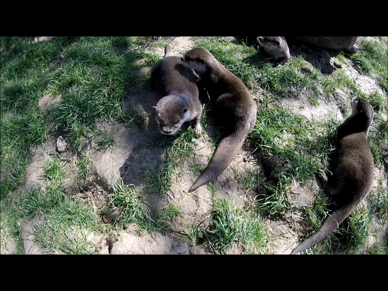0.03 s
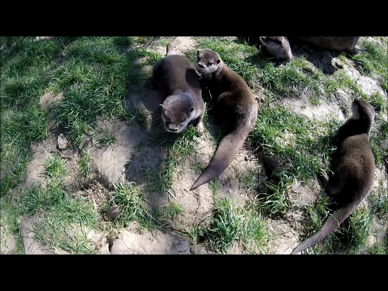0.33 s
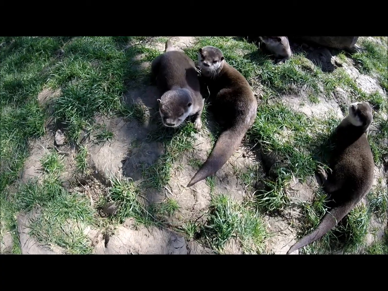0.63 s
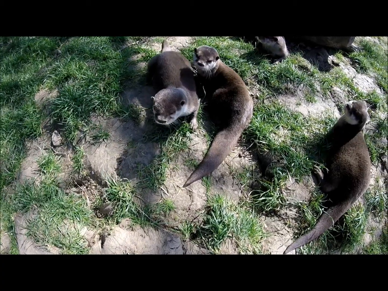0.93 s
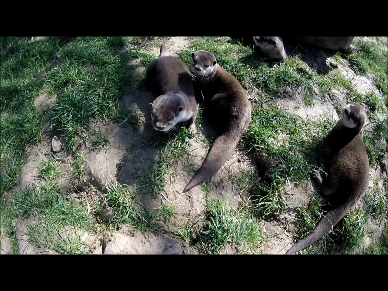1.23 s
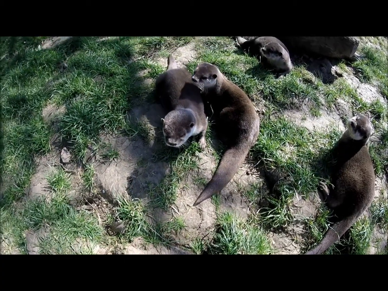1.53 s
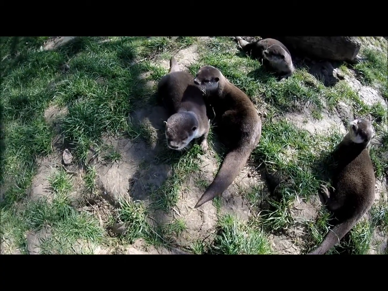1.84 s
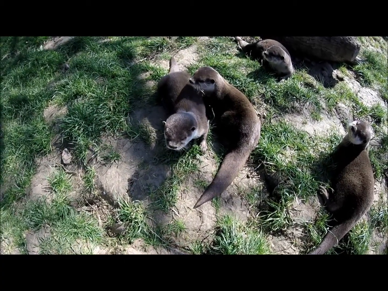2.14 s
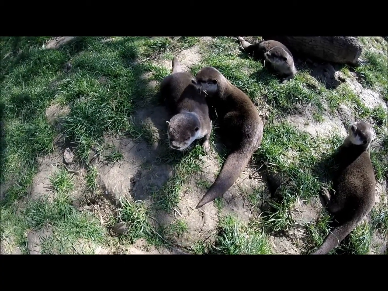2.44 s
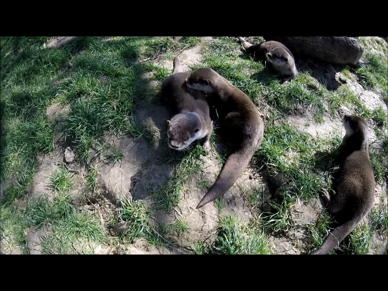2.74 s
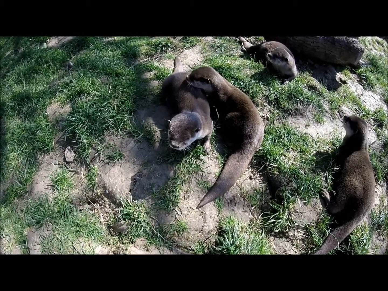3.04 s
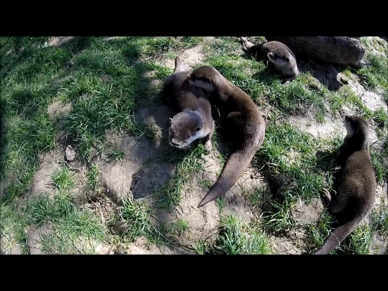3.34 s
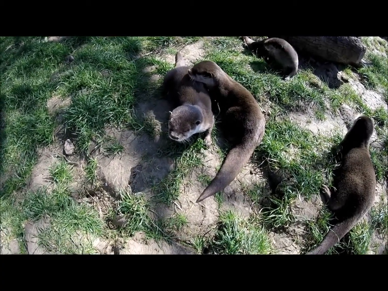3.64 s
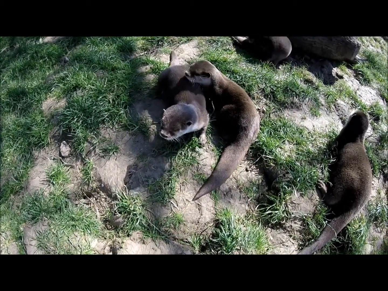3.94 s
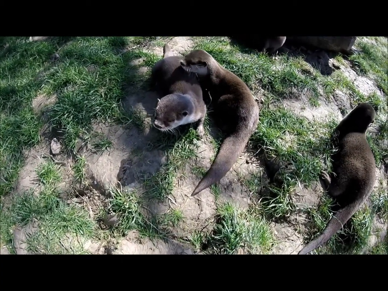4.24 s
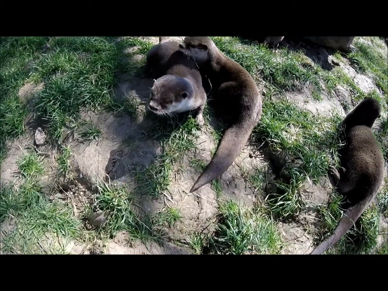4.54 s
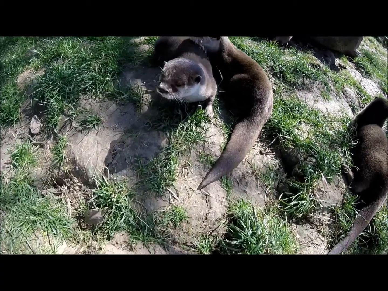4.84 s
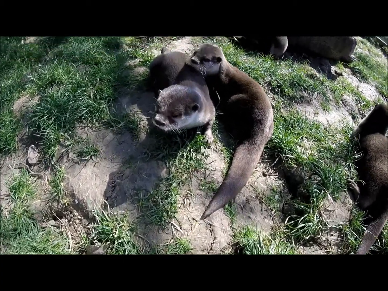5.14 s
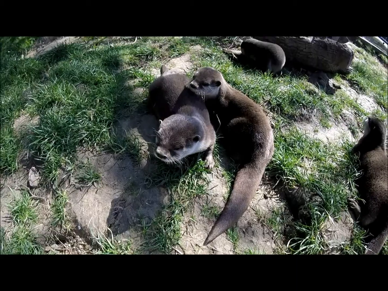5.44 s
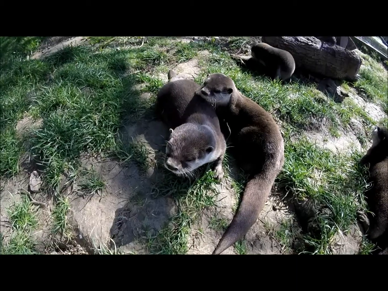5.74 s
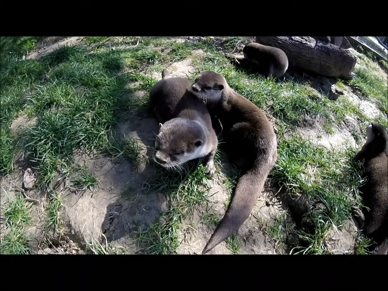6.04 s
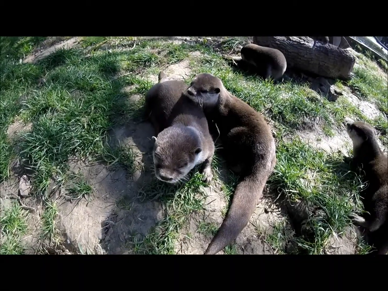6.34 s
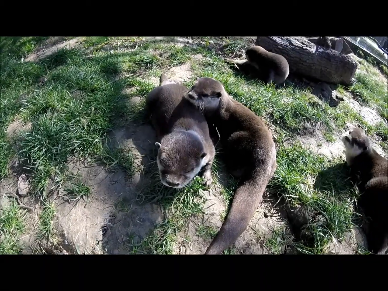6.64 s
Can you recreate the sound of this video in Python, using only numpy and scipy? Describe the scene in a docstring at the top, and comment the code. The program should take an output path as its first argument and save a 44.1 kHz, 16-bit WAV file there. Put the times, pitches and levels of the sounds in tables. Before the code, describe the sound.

After an instant of silence, faint far-off traffic and air set in outdoors, along with the low tremble of a hand holding the camera. Close to the microphone, the mechanism hisses and chatters, giving small irregular pinging ticks. Soft finger taps, a few muffled bumps and barely audible rustles come and go. From about four seconds the handling rumble grows stronger and the taps cluster, though everything stays quiet.

```python
"""A quiet outdoor enclosure, heard from a hand-held camera. After a moment's silence a faint wash of far air
and traffic sets in, with the rumble of the hand's tremor and the hiss and chatter of the camera's mechanism.
Almost at once fingers begin to knock softly on the shell, and the mechanism ticks in its resonant case.
After a second come occasional dull bumps of the grip, then faint rustles.
From four seconds on the camera moves, and the hand drives the rumble harder."""
import sys
import numpy as np
from scipy import signal
from scipy.fft import rfft, irfft, next_fast_len
from scipy.io import wavfile
from scipy.ndimage import uniform_filter1d, map_coordinates

SR = 44100
rng = np.random.default_rng(int(sys.argv[2]) if len(sys.argv) > 2 else 0)


def transcribe(u):
    """Save the signal u as a 16-bit wav file named by the first command-line argument.

    u: samples, shape (n,) or (channels, n), limited to [-1, 1]; the rate is SR.
    q: integer samples, one column per channel.
    """
    v = np.clip(np.atleast_2d(u).T, -1, 1)
    q = np.round(v * 32767).astype(np.int16)
    wavfile.write(sys.argv[1], SR, q)


N = 298998
TIME = np.arange(N) / SR


def amp(db):
    """Amplitude ratio of a level in decibels."""
    return 10 ** (np.asarray(db) / 20)


def unit(x):
    """Normalisation to rms 1."""
    return x / np.sqrt(np.mean(x ** 2) + 1e-20)


def curve(rows):
    """Linear interpolation of (seconds, value) rows at every sample."""
    return np.interp(TIME, *np.transpose(rows))


def wobble(rate):
    """Smooth random modulation: a spline through `rate` Gaussian knots a second."""
    knots = rng.standard_normal(int(N * rate / SR) + 4)
    return map_coordinates(knots, [TIME * rate])


def filtered(x, response):
    """Linear filtering: the spectrum of x times a frequency response."""
    size = next_fast_len(N + SR // 2)
    return irfft(rfft(x, size) * response(np.fft.rfftfreq(size, 1 / SR)), size)[:N]


def noise(spectrum):
    """Spectral shaping of white noise by (Hz, dB) rows on a log frequency axis; rms 1."""
    points_hz, db = np.transpose(spectrum)
    white = rng.standard_normal(N)
    return unit(filtered(white, lambda hz: amp(np.interp(np.log(hz + 1), np.log(points_hz + 1), db))))


def resonance(hz, centre, width):
    """Frequency response of a damped oscillator, 1 at its centre."""
    return 1j * hz * width / (centre ** 2 - hz ** 2 + 1j * hz * width)


# Spectrum of the far wash. Each row: frequency in Hz, relative spectral density in dB.
WASH_SPECTRUM = [(30, -41), (110, 3), (200, 0), (270, -2.5), (450, -5.5), (700, -9), (1100, -13.5),
                 (2000, -24.5), (5000, -41), (15000, -46.5)]

def distant_wash():
    """Incoherent superposition: far air and traffic merge into a dull, nearly steady noise."""
    fade_db_per_s = 0.01
    level_db = -56.5 - fade_db_per_s * TIME + 0.48 * wobble(rate=5.46)
    return amp(level_db) * noise(WASH_SPECTRUM)


def sustained(x, evenness):
    """Envelope compression evens out the swells of a narrow noise, as in a vibration kept going."""
    envelope = np.abs(signal.hilbert(x))
    power = np.abs(uniform_filter1d(envelope ** 2, size=SR // 10))
    return unit(x / (power + 1e-3) ** (evenness / 2))


# Spectra of the camera's sway and the grip's shudder.
# Each row: frequency in Hz, relative spectral density in dB.
SWAY_SPECTRUM = [(5, -51), (11, -13.5), (23, -12), (31, -1.5), (42, -6), (53, -15), (80, -41), (160, -60),
                 (400, -120)]
SHUDDER_SPECTRUM = [(20, -56), (45, -16), (62, -1), (80, 0.5), (93, -4), (112, -22), (215, -25.5),
                    (450, -43), (1500, -100)]
# Effort of the hand. Each row: time in seconds, level in dB relative to rest.
HAND_EFFORT = [(.2, .5), (.9, 0), (1.45, 3), (1.75, -2), (2.7, 0.5), (3.15, -4), (3.4, 0), (3.63, -5.5),
               (3.78, 0), (3.97, -1), (4.05, 9), (4.18, 3), (4.32, 11.5), (4.4, 5), (4.47, 13), (4.54, 8.5),
               (4.7, 14), (4.93, 6), (5.0, 13.5), (5.08, 4.5), (5.2, 14), (5.33, 8.5), (5.4, 12.5),
               (5.48, 4.5), (5.57, 10.5), (5.69, 5), (5.76, 9), (5.86, 4), (5.97, 12), (6.04, 9.5),
               (6.17, 12.5), (6.43, 9), (6.54, -3.5), (6.68, 7), (6.78, 1)]

def hand_rumble():
    """Forced vibration: the trembling hand sways and shudders the camera, harder as its effort grows."""
    effort_db = curve(HAND_EFFORT)
    tremor_db = 1.97 * wobble(rate=13)
    sway = sustained(noise(SWAY_SPECTRUM), evenness=0.88)
    shudder = sustained(noise(SHUDDER_SPECTRUM), evenness=0.47)
    sway_db = -48.5 + effort_db + tremor_db
    shudder_db = -55.5 + 0.72 * effort_db + tremor_db
    return amp(sway_db) * sway + amp(shudder_db) * shudder


# Spectrum of the mechanism's hiss. Each row: frequency in Hz, relative spectral density in dB.
HISS_SPECTRUM = [(300, -7.5), (1100, -1.5), (1950, 1), (2400, -0.5), (3100, -0.5), (3550, -3), (4200, -4),
                 (5300, -9), (7300, -10), (8000, -12.5), (10000, -16), (12500, -23.5), (15000, -30)]

def mechanism_hiss():
    """Broadband noise from the running mechanism, with slight random amplitude modulation."""
    return amp(-62 + 0.56 * wobble(rate=20)) * noise(HISS_SPECTRUM)


# Activity of the mechanism, for chatter and patter. Each row: time in seconds, relative level in dB.
ACTIVITY = [(.2, 1), (.65, -2.5), (.8, -0.5), (1.3, -2), (1.5, 1), (1.75, 0), (2.3, 0.7), (2.7, 1),
            (3.05, -0.3), (3.3, -1), (3.55, 0), (4.3, 0), (4.95, -0.5), (5.35, 0.5), (5.87, -1), (6.1, -1),
            (6.24, 2.5), (6.44, 2), (6.55, -3.5), (6.78, -5)]
# Modes of the camera case. Each row: frequency in Hz, bandwidth in Hz, relative gain in dB,
# chatter depth in dB, dB of drive per dB of activity.
CASE_MODES = [(1472, 96, 2.2, 2, 0.5), (2152, 87, -1.5, 2, 0.5), (2657, 78, 2.3, 2.5, 1),
              (3380, 154, -4, 3, 1), (4060, 270, -12.5, 5.5, 1.5), (6150, 270, -11.5, 3.5, 0),
              (6200, 140, -11, 2, 1), (8370, 220, -18, 5, 1)]

def case_chatter():
    """Resonance under random forcing: the mechanism's fine chatter rings the case modes unevenly."""
    activity_db = curve(ACTIVITY)
    shared_flutter = wobble(rate=60)
    ring = np.zeros(N)
    for centre, width, gain_db, depth_db, follows in CASE_MODES:
        flutter = 0.5 * shared_flutter + 0.79 * wobble(rate=110)
        drive = unit(rng.standard_normal(N) * amp(follows * activity_db + depth_db * flutter))
        ring += amp(gain_db) * filtered(drive, lambda hz: resonance(hz, centre, width))
    return amp(-64.5) * unit(ring)


def mechanism_patter(per_s=330, middle_hz=2404, spread_octaves=0.307, life_cycles=4.9, scatter_db=2.5):
    """Shot noise: tiny clicks at random moments, each a damped oscillation at its own pitch."""
    draws = rng.random((int(per_s * N / SR), 3))
    onsets = (draws[:, :1] * N).astype(int)
    deviations = np.sqrt(2) * np.arctanh(0.96 * (2 * draws[:, 1:] - 1))  # bell-shaped, bounded
    pitch, size = deviations.T[..., None]
    offsets = np.arange(SR // 100)
    cycles = middle_hz * 2 ** (spread_octaves * pitch) * offsets / SR
    age = cycles / life_cycles
    strength = amp(scatter_db * np.minimum(size, 2))
    clicks = strength * age * np.exp(-2 * age) * np.sin(2 * np.pi * cycles)
    patter = np.bincount((onsets + offsets).ravel(), clicks.ravel(), N)[:N]  # overlapping clicks add
    return amp(-69.5 + curve(ACTIVITY)) * unit(patter)


def blows(events, modes, attack_s):
    """Modal impact: a softer contact excites the high modes less; a resting finger damps the ring."""
    out, t = np.zeros(N + SR), np.arange(SR // 2) / SR
    for start, peak_db, cutoff_hz, ring_share in events:
        ring = np.zeros(len(t))
        for hz, mode_db, t60 in modes:
            strength = amp(mode_db + rng.normal(0, 1)) / (1 + (hz / cutoff_hz) ** 4)
            decay = np.exp(-np.log(1000) * t / (t60 * ring_share))
            ring += strength * decay * np.sin(2 * np.pi * hz * t)
        ring *= 1 - np.exp(-(t / attack_s) ** 2)
        out[round(start * SR):][:len(t)] += amp(peak_db) * ring / np.abs(ring).max()
    return out[:N]


# Modes of the shell. Each row: frequency in Hz, relative level in dB, 60 dB decay time in seconds.
SHELL_MODES = [(160.5, -5.5, 0.098), (217, -3, 0.11), (348, -3.5, 0.18)]
# Finger contacts. Each row: start in seconds, relative peak level in dB, contact cut-off in Hz,
# ring time as a fraction of the modes' decay time.
FINGER_KNOCKS = [(0.186, -42.5, 215, .5), (0.76, -42, 210, 1), (3.3535, -41.5, 240, 0.27),
                 (3.997, -44.5, 260, .4), (4.53, -41, 240, 0.99), (4.934, -46, 220, 0.42),
                 (5.115, -44, 140, 1), (5.148, -43, 120, 0.89), (5.245, -43.5, 120, 1),
                 (5.457, -40.5, 250, .7), (5.481, -47, 480, 1), (5.499, -37, 456, 0.72),
                 (5.812, -41, 200, .8), (5.85, -45, 220, 1)]

def finger_knocks():
    """Free vibration after impact: fingers knock softly and the shell's modes ring down."""
    return amp(-2) * blows(FINGER_KNOCKS, SHELL_MODES, attack_s=0.00235)


def strike_envelope(t, rise_s, t60_s):
    """A quick rise and the exponential decay of a damped vibration; peak 1."""
    shape = (1 - np.exp(-(t / rise_s) ** 2)) * np.exp(-np.log(1000) * t / t60_s)
    return shape / shape.max()


# The mechanism's clearest ticks. Each row: start in seconds, peak level of the ping in dB,
# its pitch in Hz, rms level of the scrape at its loudest in dB.
MECHANISM_TICKS = [(0.2252, -53, 2620, -62), (0.2734, -58, 2650, -70), (0.43, -54, 1480, -65),
                   (0.491, -55, 2630, -67), (0.559, -57, 1480, -64), (0.5945, -54.5, 2720, -69),
                   (0.6264, -56, 2710, -67), (0.656, -53, 2240, -64), (0.9037, -55, 2670, -64),
                   (1.074, -56, 3250, -57), (1.4163, -52, 2600, -64), (1.4408, -47, 2640, -57),
                   (1.4935, -49.5, 2210, -62), (1.507, -51, 2660, -62), (1.8004, -57, 2690, -59),
                   (1.9409, -54, 2100, -63), (2.2376, -50, 1990, -63), (2.331, -53, 2700, -58),
                   (2.491, -54, 2580, -59), (2.6064, -55, 2600, -62), (2.6314, -54, 2670, -67),
                   (2.805, -55.5, 1485, -66), (2.9784, -52, 1480, -61), (3.122, -56, 1490, -67),
                   (3.251, -53, 2580, -58), (3.43, -54.5, 2200, -66), (3.5424, -53.5, 1480, -62),
                   (3.568, -52, 2660, -58), (3.947, -54, 2670, -64), (4.18, -58, 2670, -68),
                   (4.428, -54, 2670, -70), (4.6103, -52.5, 2675, -68), (4.621, -50, 2640, -60),
                   (4.8677, -52, 2240, -68), (5.357, -52, 1490, -64), (5.425, -56, 1470, -68),
                   (5.5766, -52, 1430, -66), (5.7208, -53, 1450, -65), (5.7344, -56, 3220, -71),
                   (5.9414, -54, 1540, -65), (5.9574, -57, 2650, -62), (5.991, -50, 2220, -62),
                   (5.9945, -53, 1450, -64), (6.0047, -53, 2680, -69), (6.025, -54.5, 2680, -70),
                   (6.1155, -47.5, 1470, -68), (6.1225, -54.5, 2200, -68), (6.235, -56, 2660, -67),
                   (6.399, -52, 2680, -66), (6.444, -56, 2700, -66)]

def mechanism_ticks():
    """Transient excitation: a short scrape inside the camera sets off a damped ping."""
    out, t = np.zeros(N + SR), np.arange(SR // 10) / SR
    hz = np.fft.rfftfreq(len(t), 1 / SR)
    case_response = resonance(hz, centre=2100, width=2200) ** 2  # the case passes little treble
    for start, ping_db, pitch_hz, scrape_db in MECHANISM_TICKS:
        friction = unit(irfft(rfft(rng.standard_normal(len(t))) * case_response, len(t)))
        scrape = friction * strike_envelope(t, rise_s=0.0022, t60_s=0.045)
        ping = np.sin(2 * np.pi * pitch_hz * t) * strike_envelope(t, rise_s=0.0017, t60_s=0.037)
        out[round(start * SR):][:len(t)] += amp(ping_db) * ping + amp(scrape_db) * scrape
    return out[:N]


# Modes of the grip. Each row: frequency in Hz, relative level in dB, 60 dB decay time in seconds.
GRIP_MODES = [(69.4, -25, 0.11), (83, 15, 0.17)]
# Shifts of the grip. Each row: start in seconds, relative peak level in dB, contact cut-off in Hz,
# ring time as a fraction of the modes' decay time.
GRIP_BUMPS = [(1.168, -37.5, 80.7, 0.7), (1.525, -39.5, 83.4, 0.74), (4.018, -34, 86.1, 1),
              (4.29, -41, 72, 0.91), (4.465, -44.5, 60, 1), (4.856, -32.5, 83.4, 1), (5.534, -35, 73, 0.94)]

def grip_bumps():
    """Soft impact: the shifting grip excites low, damped modes, heard as dull bumps."""
    return amp(-0.5) * blows(GRIP_BUMPS, GRIP_MODES, attack_s=0.011)


# Faint rustles, and in the last row the drawn-out scrape of the mechanism's tick near 5.99 s. # Each row:
# middle in seconds, half-length in seconds, rms level at the middle in dB, # centre frequency in Hz.
RUSTLE_PUFFS = [(1.47, .05, -72, 2780), (1.938, .012, -68, 4800), (4.785, .025, -67, 5000),
                (5.65, 0.016, -66, 5600), (5.795, .022, -65, 3400), (5.99, 0.019, -64, 1900)]

def rustles(width_hz=3000):
    """Amplitude modulation: bands of bright noise swell and fade under Gaussian envelopes."""
    out = np.zeros(N)
    for middle, half_length, db, centre_hz in RUSTLE_PUFFS:
        band = unit(filtered(rng.standard_normal(N), lambda hz: resonance(hz, centre_hz, width_hz) ** 2))
        swell = np.exp(-((TIME - middle) / half_length) ** 2)
        out += amp(db) * swell * band
    return out


def scene():
    """Superposition: all sources add at one microphone."""
    continuous = distant_wash() + hand_rumble() + mechanism_hiss() + case_chatter() + mechanism_patter()
    transients = finger_knocks() + mechanism_ticks() + grip_bumps() + rustles()
    return (continuous + transients)[None]


def record(dry):
    """Gating and band limiting: the camera starts after a moment and cuts off the highest treble."""
    start_s, fade_in_s, top_hz = 0.1562, 0.002, 15050
    running = np.clip((TIME - start_s) / fade_in_s, 0, 1)
    return filtered(dry[0] * running, lambda hz: hz < top_hz)[None]


dry = scene()
out = record(dry)
transcribe(out)
```